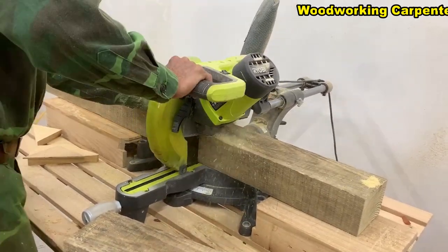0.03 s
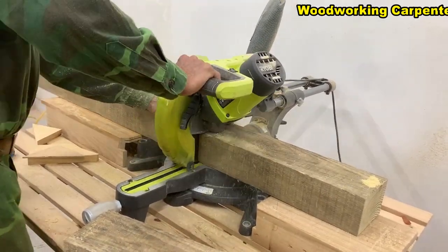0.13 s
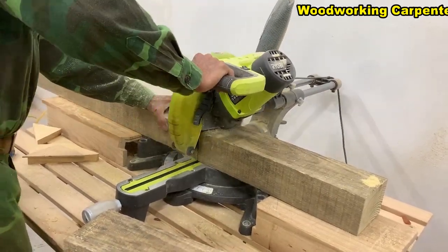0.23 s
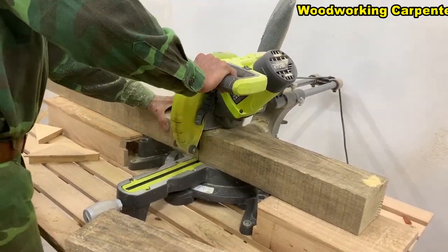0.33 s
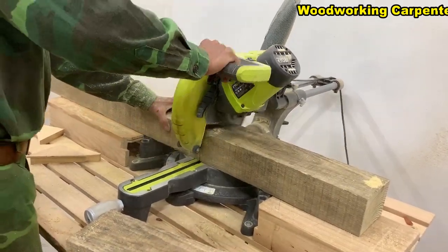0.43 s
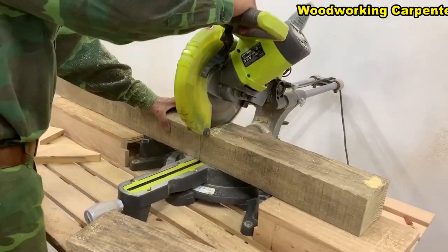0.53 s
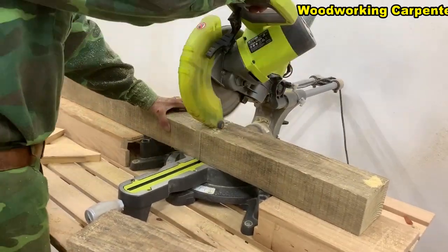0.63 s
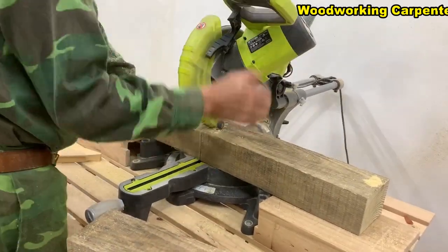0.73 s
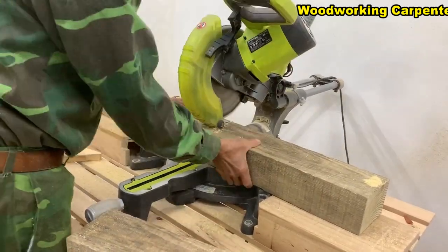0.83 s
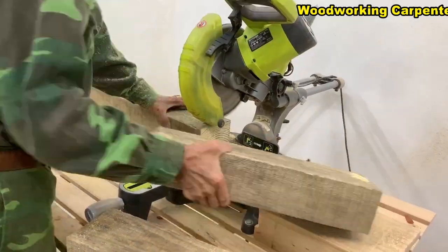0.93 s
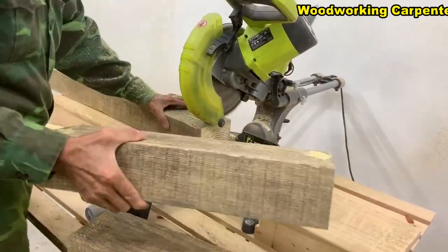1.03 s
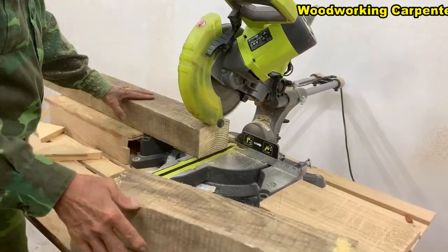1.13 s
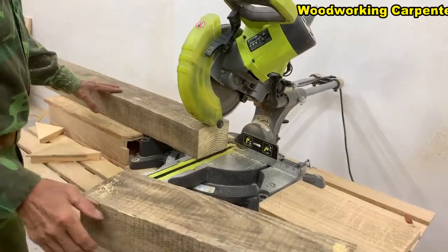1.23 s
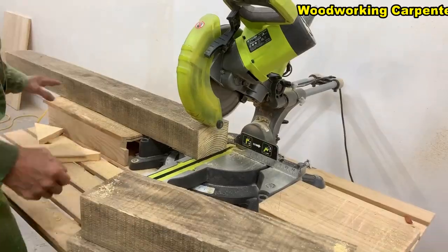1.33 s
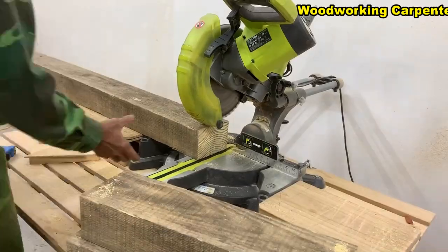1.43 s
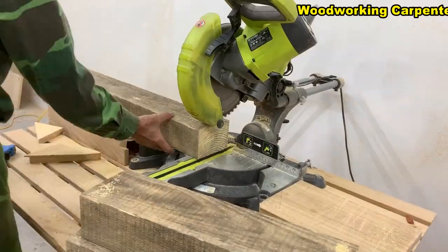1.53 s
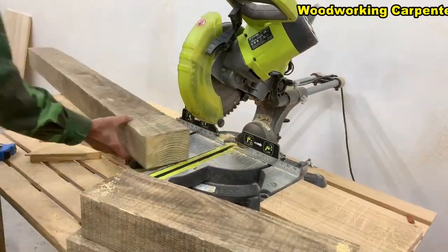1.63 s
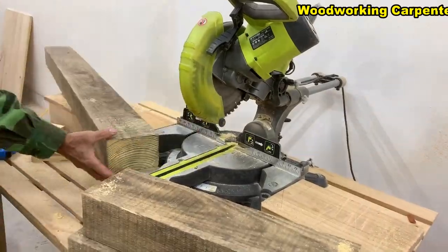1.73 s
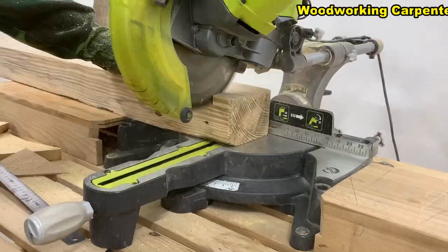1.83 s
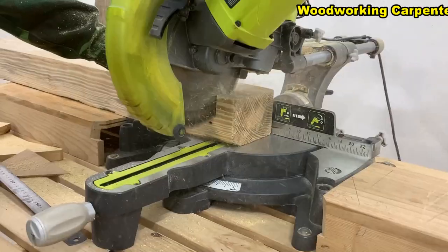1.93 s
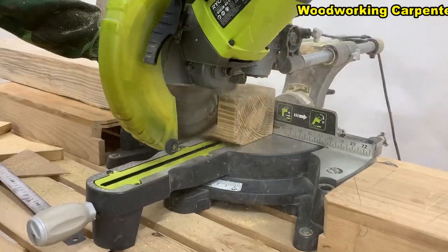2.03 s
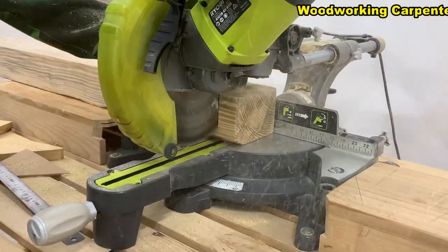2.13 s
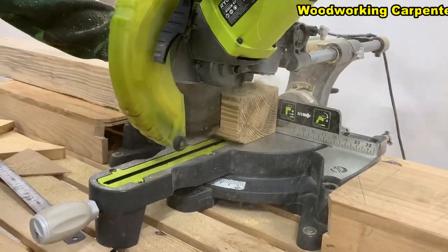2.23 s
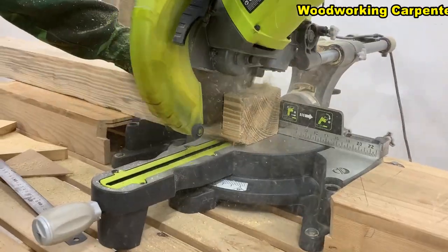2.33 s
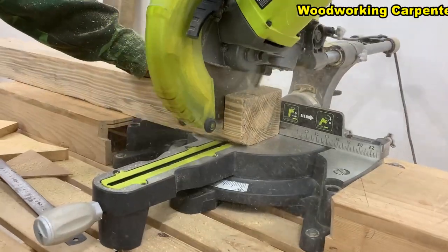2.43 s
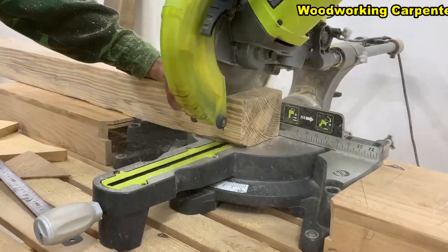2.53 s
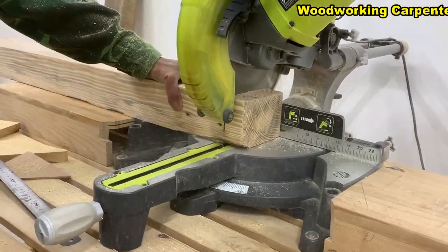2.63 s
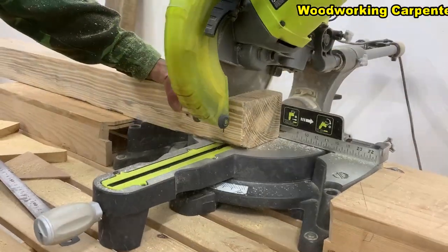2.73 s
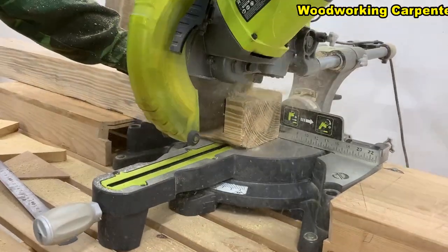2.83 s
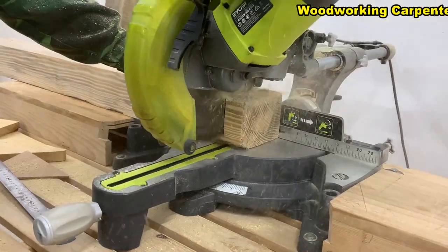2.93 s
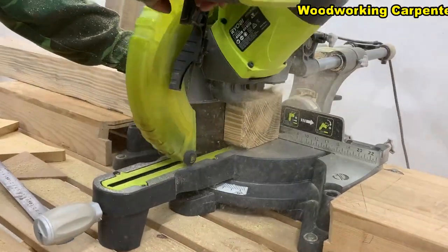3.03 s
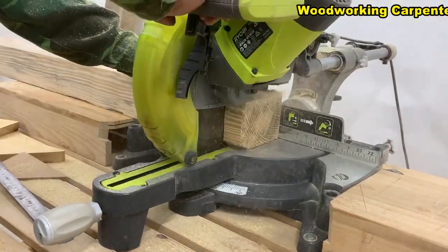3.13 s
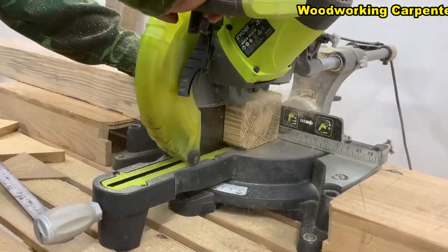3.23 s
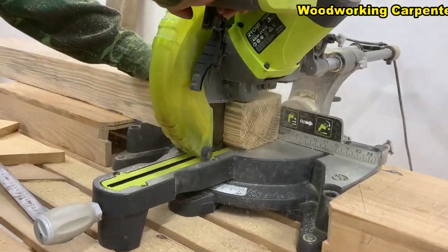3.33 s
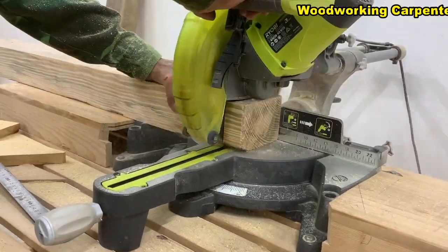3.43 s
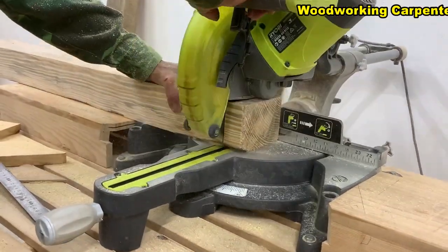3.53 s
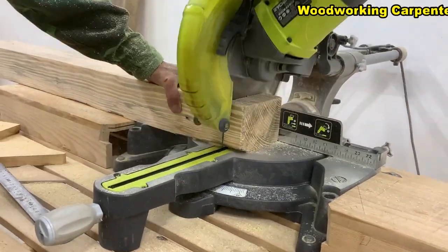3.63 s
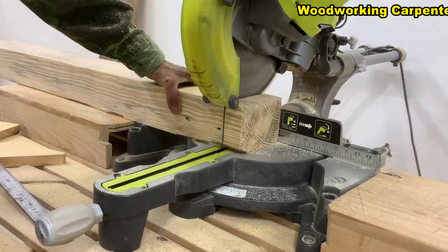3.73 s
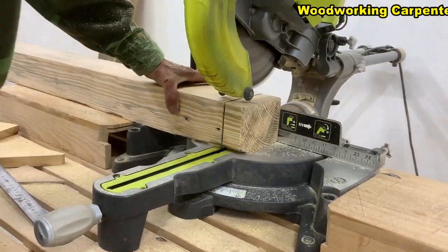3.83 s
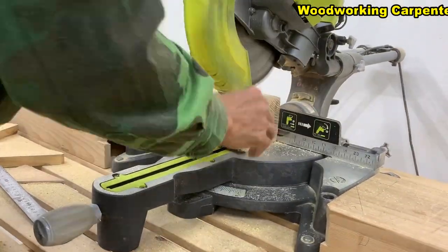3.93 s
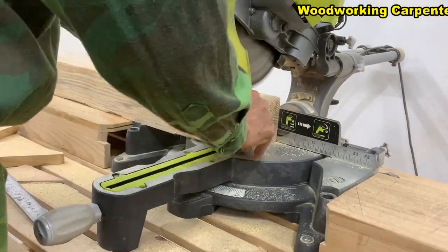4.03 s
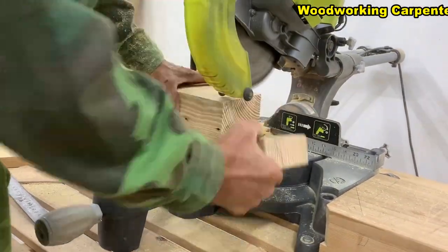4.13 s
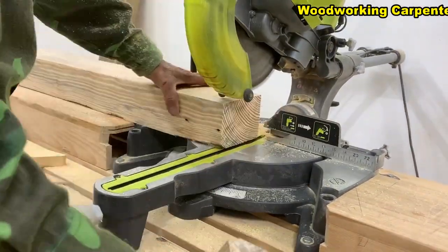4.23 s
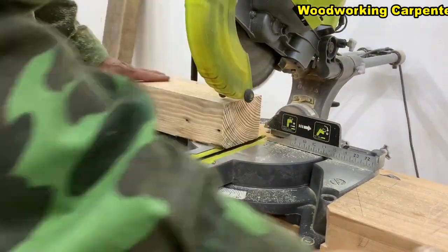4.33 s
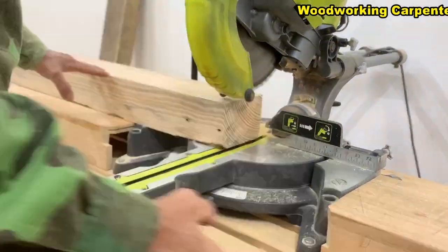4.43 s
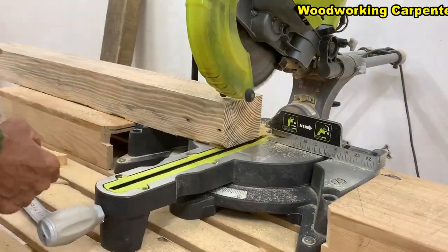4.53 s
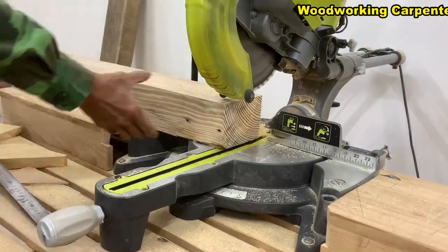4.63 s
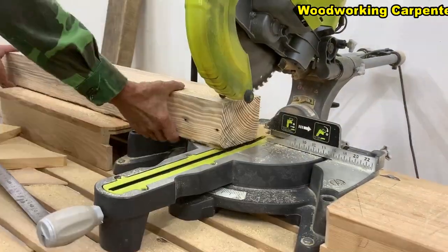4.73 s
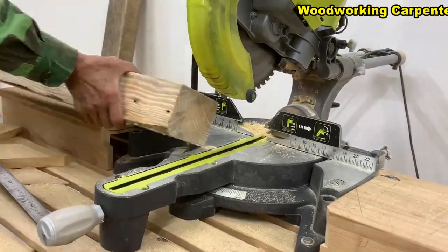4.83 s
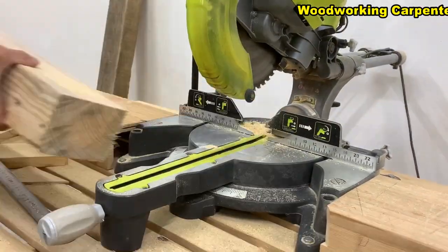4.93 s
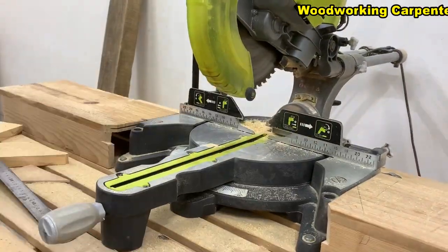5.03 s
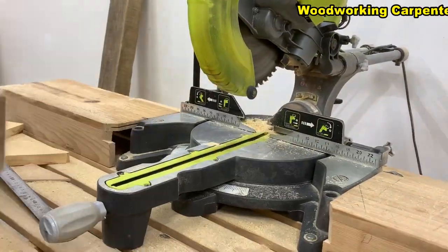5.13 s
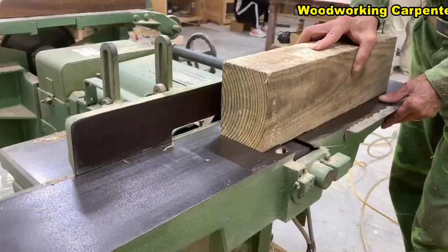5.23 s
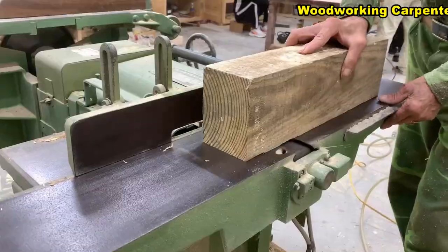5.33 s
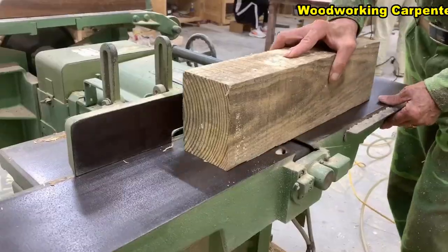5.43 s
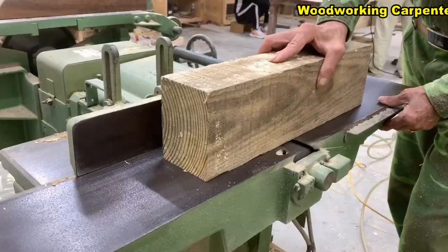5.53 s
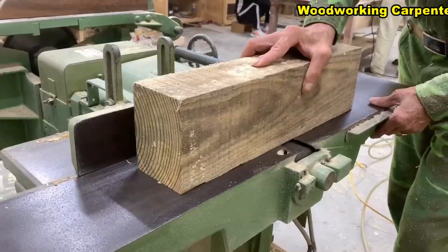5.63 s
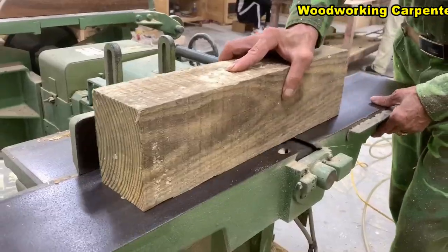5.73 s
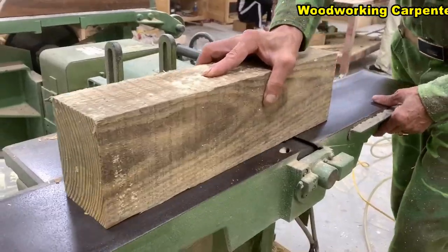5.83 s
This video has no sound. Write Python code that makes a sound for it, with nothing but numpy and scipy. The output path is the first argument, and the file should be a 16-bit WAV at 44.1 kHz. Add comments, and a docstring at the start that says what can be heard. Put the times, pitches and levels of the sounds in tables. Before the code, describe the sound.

Close stereo sound of power tools with little echo: a short saw cut, chattering brake whine, fading metallic rub and one hard timber knock; a tiny gap, then a stronger cut with spraying hiss and another spin-down. Softer knocks and a brief scrape come as wood is lifted. After another tiny gap, a planer buzzes coarsely with a short howl, over the continuous idling hum of machinery.

```python
"""A mitre saw rasps and hisses through the end of a cut, twice, then brakes with a falling whine and a ringing blade.
Knocks of timber on the saw table follow, and after a last short gap a jointer planes a beam with a steady buzz.
The hum of an idling cutter block lies under all three scenes. The cuts are coloured noise, the blade is a bank
of ringing modes, the whines and hums are sine stacks, and the knocks are decaying modes with bursts of noise."""
import sys
import numpy as np
from scipy import signal
from scipy.fft import rfft, irfft
from scipy.io import wavfile

SR = 44100
rng = np.random.default_rng(int(sys.argv[2]) if len(sys.argv) > 2 else 0)


def master_out(mix):
    """Clip the mix to full scale and print it as 16-bit PCM to the path in sys.argv[1]."""
    frames = np.transpose(np.atleast_2d(mix))
    ceiling = np.clip(frames, -1, 1)
    pcm = np.round(ceiling * 32767).astype(np.int16)
    wavfile.write(sys.argv[1], SR, pcm)


N = 259749
TIME = np.arange(N) / SR  # s

# Short gaps between the three scenes: start [t/s], end [t/s]
GAPS = [(1.8515, 1.8635), (5.236, 5.248)]
# One saw cut in each of the first two scenes: brake bites [t/s], speed falls to 1/e in [t/s],
# rasp before easing [level/dB], hiss before easing and surging [level/dB], blade shudder [level/dB],
# rub of the coasting blade [level/dB], change of the hum until the brake [level/dB]
SAW_CUTS = [(0.506, .113, -35.5, -31.5, -45, -54, -7), (3.661, .123, -33.5, -27.5, -35, -52.5, -1.5)]
# The arm pushes the blade into the wood: peak [t/s], half length [t/s], speed lost [share],
# drone of the beam at the peak [level/dB]
ARM_PUSHES = [(0, 0.049, .11, -58), (0.184, .08, .13, -55.5), (0.332, .06, .09, -55),
              (2.153, 0.14, .2, -50.5), (2.47, .09, .12, -51), (2.656, .1, .09, -42.5),
              (3.165, .16, .19, -45.5), (3.492, .095, .17, -46.5)]
# Spectrum of the soft rush of air: [f/Hz], density per Hz [level/dB]
AIR_COLOUR = [(30, -19), (130, -26), (230, -1), (330, -9.5), (450, 0.5), (1100, 5), (2000, -4.5),
              (3500, -6), (5500, -6), (7600, -0.5), (10000, -10), (13000, -1), (15500, -9.5)]

FREE_HZ = 9615  # gear whine of the unloaded motor
BRAKE_S = .16  # how long the brake grips hard
TOP_HZ = 15750  # upper edge of the sound


def saw(cut, shimmer_db=-25, shimmer_t60=1.0, grain=0.082, count=36):
    """Teeth tear out chips unevenly; the kerf damps the blade, and the shudder of the brake sets it ringing."""
    # Torn wood: [f/Hz], density per Hz [level/dB]
    rasp_colour = [(120, -97.5), (220, -22.5), (400, -1.5), (600, -3), (900, 0), (1400, 0.5), (1900, 2.5),
                   (3000, 3.5), (3500, 5), (4800, 6), (5800, 4), (7500, 7), (12000, -10)]
    # Fine spray of chips: [f/Hz], density per Hz [level/dB]
    hiss_colour = [(3500, -10), (5500, -13), (6500, -3), (7500, 1.5), (9000, 4.5), (10200, 2.5), (11300, 5),
                   (12500, 6.5), (14000, 5.5), (15700, 6.5)]
    # Strongest blade modes: [f/Hz], relative [level/dB], t60 [t/s]
    blade_modes = [(2420, -27, .5), (3618, -27, 1.3), (4484, -24, .7), (7477, -22, .7), (7913, -20, .6),
                   (11000, -26, .5), (12300, -16, .55), (12600, -22, .5), (14740, -20, .45)]
    ease_s, ease_db = 0.57, -4  # the cut thins out over its last part
    rasp_fall_db_per_s, hiss_fall_db_per_s, hiss_hold_s = 49, 190, .14
    shudder_half_s, kick_db, blade_db = 0.038, 2, 8
    surge_power = 0.68  # the hiss surges with the speed each time the arm eases off

    brake, slowing_s, rasp_db, hiss_db, shudder_db, rub_db, _ = cut
    pace = speed(brake, slowing_s)
    thinning_db = ease_db * ramp(brake - ease_s, ease_s)
    rasp_level = undb(rasp_db + thinning_db - rasp_fall_db_per_s * since(brake))
    hiss_level = undb(hiss_db + thinning_db - hiss_fall_db_per_s * since(brake + hiss_hold_s))
    surge = (under_load() / .9) ** surge_power
    tearing = (1 + grain * walk(350)) * undb(0.42 * walk(25))
    rasp = shaped(rasp_colour, side_db=-5.5) * rasp_level * pan(0.45)
    hiss = shaped(hiss_colour, side_db=-2.0) * hiss_level * surge * pan(-0.73)
    chips = restless((rasp + hiss) * tearing, depth_db=1.8, rate=18, count=20)

    # the teeth drive the blade faintly, the shudder drives it hard
    kick = undb(shudder_db + kick_db) * swell(brake + BRAKE_S - shudder_half_s, 2 * shudder_half_s)
    blows = noise() * (0.083 * rasp_level + kick)
    blade = sum(undb(db) * ring(blows, hz, t60) for hz, db, t60 in blade_modes) * undb(blade_db)
    # a thin disc has a crowd of weaker modes too; the high ones die first
    crowd = 1700 * 7.5 ** ((np.arange(count) + rng.random(count)) / count)
    shimmer = sum(ring(blows, hz, shimmer_t60 * np.sqrt(4000 / hz)) for hz in crowd)
    blade += undb(shimmer_db) * shimmer
    # the turning disc swings its ring past the ear
    turn = 2 * np.pi * np.cumsum(FREE_HZ * pace / 40) / SR
    metal = blade * (1 + .5 * np.sin(turn))
    metal = metal + motor(pace, gear_level(brake)) + coasting(brake, shudder_db, rub_db, shudder_half_s)
    return (low_cut(chips, 212) + low_cut(metal, 470)) * pan(-2.1)


def motor(pace, gear, unsteady=0.018, chatter_db=-3):
    """Gear and armature whines follow the shaft speed; gears chatter in their backlash, most under the brake."""
    # Higher whines, each loudest at a resonance of the housing: multiple of the gear whine,
    # peak before roughness [level/dB], resonance [f/Hz], width [octaves]
    whines = [(1.7, -38.5, 14000, .25), (2.25, -40, 6300, .17), (5.1, -49, 7000, .24), (5.1, -57, 4300, .2)]
    hz, rough = FREE_HZ * pace, .45
    braking = np.clip(2 * (1 - pace), .15, 1)
    wander = unsteady * (braking ** 2 * gear / gear.max() + 0.0956) * walk(212)
    phase = 2 * np.pi * np.cumsum(hz * (1 + wander + .004 * walk(12.5))) / SR
    # complex noise varies level and phase together, differently left and right
    flicker = np.array([walk(220) + 1j * walk(280), walk(160) + 1j * walk(260)])
    rattle = 1 + rough * (1 + braking) * flicker
    chatter = np.array([walk(1100) + 1j * walk(830), walk(1100) + 1j * walk(990)])
    chatter = chatter * undb(chatter_db + 1.1 * walk(60)) * braking
    fitful = pace ** .4 * undb(2.5 * walk(18))
    out = gear * fitful * ((rattle + chatter) * np.exp(1j * phase)).real
    for k, db, centre_hz, octaves in whines:
        housing = np.exp(-(np.log2(k * hz / centre_hz) / octaves) ** 2) * (k * hz < TOP_HZ)
        out += undb(db) * housing * (rattle[::-1] * np.exp(1j * k * phase)).real
    return out


def coasting(brake, shudder_db, rub_db, shudder_half_s, beat_hz=36, depth=0.28):
    """The slightly warped disc shudders as the brake lets go and rubs on: a fluttering rasp in its low resonances."""
    # Shudder of the disc: [f/Hz], density per Hz [level/dB]
    shudder_colour = [(1200, -34), (2200, -27), (2900, -8), (3600, 9), (4600, 2), (5900, 16), (7000, -24),
                      (12000, -27)]
    rub_colour = [(1200, -28), (1900, 1.5), (2500, -3), (3100, -12), (3620, 6.5), (4050, -8),
                  (4550, -0.5), (5200, -14), (6200, -4.5), (9000, -12), (12000, -19)]
    rub_fall_db_per_s, coast_s = 4.5, 0.94
    release = brake + BRAKE_S
    turn = 2 * np.pi * np.cumsum(beat_hz * (1 + 0.211 * walk(6.26))) / SR
    shudder = shaped(shudder_colour) * undb(shudder_db) * swell(release - .02, shudder_half_s)
    turning = ramp(brake, BRAKE_S) * (1 - ramp(brake + coast_s, .1))
    rub = shaped(rub_colour) * undb(rub_db - rub_fall_db_per_s * since(release)) * turning
    return restless(shudder + rub, depth_db=3.5, rate=20.0) * (1 + depth * np.sin(turn))


def gear_level(brake):
    """The gear whine jumps up when the brake bites and drops when it lets go."""
    run_db, brake_db, bite_s, fall_db_per_s = -48, -35, 0.012, 420
    return undb(run_db + (brake_db - run_db) * ramp(brake, bite_s) - fall_db_per_s * since(brake + BRAKE_S))


def speed(brake, slowing_s):
    """Shaft speed as a share of free running: the brake lets it die away, then it coasts."""
    coast_share, coast_slowing_s = 0.13, .7
    braked = under_load() * np.exp(-since(brake) / slowing_s)
    return np.maximum(braked, coast_share * np.exp(-since(brake) / coast_slowing_s))


def under_load():
    """Share of the free speed that is left as each push drags the motor down."""
    return 1 - sum(sag * swell(s, half) for s, half, sag, _ in ARM_PUSHES)


def jointer(tone_db=1.5, chips_db=0, bite=0.24, jitter=0.0013, waver_db=3):
    """Knives strike the beam at a steady rate: a buzzing stack, and a spray of chips at every stroke."""
    # Overtones of the knife strokes: multiple of the knife rate, relative [level/dB]
    overtones = [(1, -16), (2, -1), (4, -15), (5, -8), (6, 0), (7, -7), (8, -3), (9, -11), (10, -11),
                 (11, -9), (13, -11), (14, -11), (16, -6), (18, -6), (20, -7), (21, -8), (24, -11),
                 (27, -11), (28, -9), (30, -12), (34, -5), (35, -8), (36, -10), (37, -8), (38, -4),
                 (40, -5), (41, -11), (42, -10), (44, -10)]
    # Spray of chips: [f/Hz], density per Hz [level/dB]
    chip_colour = [(40, -45), (140, -23), (300, -9), (600, -1), (2800, 3.5), (5300, 3), (7000, 0),
                   (11000, -1.5), (15500, -4)]
    knife_hz, plane_db = 348.27, -33
    whistle_hz, whistle_db = 1538.3, -45.5
    howl_db, howl_swell_db = -50, -36  # steady part, and the swell added to it
    howl_peak_s, howl_rise_s, howl_fall_s = 5.73, 0.14, 0.026

    phase = 2 * np.pi * np.cumsum(knife_hz * (1 + jitter * walk(96))) / SR
    now = TIME >= GAPS[1][1]
    # knots and fibres make the upper overtones waver
    grain = 0.74 * walk(36) + 0.75 * np.array([walk(60), walk(60)])
    tone = 0
    for k, db in overtones:
        lead = rng.uniform(0, 2 * np.pi) + np.array([[.5], [-.5]]) * min(.5 + k / 20, 1)
        waver = waver_db * min(k / 10, 1) * np.roll(grain, rng.integers(N), axis=1)[:, now]
        tone = tone + undb(db + waver) * np.sin(k * phase[now] + lead)
    chips = restless(shaped(chip_colour, side_db=-4), depth_db=1.0, rate=25)
    strokes = 1 + bite * np.cos(2 * phase) + 0.14 * np.cos(phase)
    planing = undb(chips_db) * chips * strokes * now
    planing[:, now] += undb(tone_db) * unit(tone)
    # the table howls on the eighth overtone, swelling once as the beam passes
    passing = swell(howl_peak_s, np.where(TIME < howl_peak_s, howl_rise_s, howl_fall_s))
    howl_level = undb(howl_db) + undb(howl_swell_db) * passing
    howl = howl_level * np.sin(8 * phase + .7 * walk(40)) * now
    whistle = undb(whistle_db) * np.sin(2 * np.pi * whistle_hz * TIME + .3 * walk(10)) * now
    return (low_cut(planing, 226) * undb(plane_db) + howl + whistle) * pan(-0.82)


def knocks(crack_db=-4, crack_t60=0.015, scuff_db=-23, scuff_t60=0.24):
    """Each blow cracks and thuds in the beam, and the rough wood scuffs on; hard blows ring the metal table."""
    # Timber against the saw table: [t/s], click [level/dB], thud [level/dB]
    blows = [(1.199, -8.5, -21), (4.505, -22.5, -25), (4.538, -23.5, -55), (4.685, -36, -60),
             (4.776, -36, -42), (4.788, -29, -52), (4.8817, -34, -60), (4.8851, -18, -52),
             (4.908, -32, -52)]
    # Modes of the metal table: [f/Hz] before a random detune, relative [level/dB], t60 [t/s]
    table_modes = [(2467, -16, .02), (4040, 2, .02), (4280, -7, .02), (5660, -8, .015), (6480, -5, .014),
                   (8330, 1, .008)]
    # Modes of the beam: [f/Hz] before a random detune, relative [level/dB], t60 [t/s]
    beam_modes = [(368, -11, .08), (470, -8, .09), (787, -14, .06), (1035, 0, .075), (1218, -8, .06),
                  (1305, -6, .05), (1520, -10, .05), (1900, -13, .04)]
    # Contact noise of a blow: [f/Hz], density per Hz [level/dB]
    crack_colour = [(40, -50), (150, -25), (400, -4), (1200, 0), (2400, -3), (3100, -5), (4200, -1),
                    (6200, 0), (8500, -2), (11000, -12), (15500, -14)]
    out, t = np.zeros((2, N)), TIME[:SR // 5]
    hardest = max(click_db for _, click_db, _ in blows)

    def struck(modes):
        """Sum of decaying modes, each blow slightly detuned."""
        total = 0
        for hz, db, t60 in modes:
            detuned_hz = hz * (1 + 0.021 * rng.standard_normal())
            lead = 1.04 * rng.standard_normal((2, 1))
            total = total + undb(db - 60 * t / t60) * np.sin(2 * np.pi * detuned_hz * t + lead)
        return total

    for s, click_db, thud_db in blows:
        contact = undb(crack_db - 60 * t / crack_t60) + undb(scuff_db - 60 * t / scuff_t60)
        crack = unit(colour(rng.standard_normal((2, len(t))), crack_colour)) * contact
        # softer blows ring the metal less, beyond their lower click level
        metal = 0.68 * undb(.5 * (click_db - hardest)) * struck(table_modes)
        click = undb(click_db) * (metal + crack) * (1 - np.exp(-t / 0.00033))
        thud = undb(thud_db) * struck(beam_modes) * (1 - np.exp(-t / 0.0028))
        i = int(s * SR)
        out[:, i:i + len(t)] += (click + thud) * pan(-1.7)
    light = low_cut(out, 225)  # a short contact radiates little bass
    return room(light, wet_db=-19, t60=0.17)


def scrape():
    """Rough wood sticks and slips on the metal for a moment as the beam is lifted off the table."""
    # Scraping wood: [f/Hz], density per Hz [level/dB]
    scrape_colour = [(900, -27), (1500, -10), (2000, 5), (2600, -12), (3700, -7), (4700, 3), (6000, -9),
                     (12000, -20)]
    start_s, fade_s, level_db, slips_per_s = 4.922, 0.017, -37, 260
    slips = 1 + 0.55 * np.sin(2 * np.pi * np.cumsum(slips_per_s * (1 + 0.29 * walk(80))) / SR)
    envelope = ramp(start_s, .003) * np.exp(-since(start_s) / fade_s)
    return shaped(scrape_colour) * slips * undb(level_db) * envelope * pan(-2)


def bench(drone_power=1.73):
    """The cut shakes the table and each push makes the beam drone; in the first cut the blade sings in the kerf."""
    # Deep rumble of the table: [f/Hz], density per Hz [level/dB]
    rumble_colour = [(20, -1.5), (70, -3.5), (105, 1), (180, -3), (300, -6), (600, -40)]
    shake_colour = [(20, -26), (100, -15.0), (200, 3), (400, 8), (1500, -8.5)]  # its wooden body
    shake_db, rumble_db = -57.5, -64.5
    clear_s = 0.16  # the teeth leave the wood this long before the brake
    sing_hz, sing_db, sing_end_s = 1250, -49.5, 0.444
    starts = (0, GAPS[0][1])
    in_wood = sum((TIME >= start) * (1 - ramp(cut[0] - clear_s, 0.023)) for start, cut in zip(starts, SAW_CUTS))
    shake = shaped(shake_colour, side_db=8) * undb(shake_db)
    rumble = shaped(rumble_colour, side_db=0) * undb(rumble_db + 3.2 * walk(28))
    pressure = sum(undb(db) * swell(s, half) ** drone_power for s, half, _, db in ARM_PUSHES)
    drone = np.sin(2 * np.pi * 392 * TIME + 0.36 * walk(30)) * pressure * undb(2.4 * walk(30))
    sing = np.sqrt(2) * np.sin(2 * np.pi * sing_hz * TIME + 0.35 * walk(20))
    sing = sing * np.clip((sing_end_s - TIME) / 0.046, 0, 1) * undb(sing_db + 3.0 * walk(28))
    return ((shake + rumble) * in_wood + drone + sing) * pan(-3)


def bumps():
    """Short, soft swells of bass here and there."""
    # Dull bumps: peak [t/s], [level/dB]
    bass_bumps = [(.52, -65), (.67, -72), (3.75, -64.5), (5.425, -62), (5.78, -74)]
    bass = shaped([(20, -18), (100, -4), (170, -5), (400, -36)], side_db=-2)
    return bass * sum(undb(db) * swell(s, 0.014) for s, db in bass_bumps)


def shop():
    """The idling cutter block chops the air into a steady siren tone, over a soft rush."""
    # Hum in each scene: multiple of the hum rate (rounded to a whole number),
    # before the scene's own level [level/dB], left minus right [level/dB]
    first_hum = [(1, -59.5, -3), (2, -45.5, -4.5), (3, -58.5, -4), (4, -38, 0.5), (6, -57, -1),
                 (12, -68, -15), (18, -65, 3), (40, -60.5, 1)]
    second_hum = [(1, -58, -6), (2, -45.5, -5), (3, -64.5, -6), (4, -38.5, -3), (5, -65.5, -14),
                  (6, -55, 6), (8, -67.5, 18), (10, -51, -6), (12, -61, -6), (15, -67, -1), (20, -63.5, -5),
                  (39.8, -58, 3)]
    third_hum = [(1, -56.5, -11), (2, -45.5, -0.5), (4, -43, -16.5), (6, -40.5, -12.5), (8, -52, -3),
                 (10, -49.5, -13)]
    hum_hz, air_db = 251.76, -53.5
    phase = 2 * np.pi * np.cumsum(hum_hz * (1 + 0.00035 * walk(2.98))) / SR
    shot = np.searchsorted([end for _, end in GAPS], TIME)  # scene number 0, 1 or 2
    flutter = np.array([walk(28), walk(18)])
    out = undb(air_db) * shaped(AIR_COLOUR, side_db=0.5) * pan(0.31)
    for i, partials in enumerate([first_hum, second_hum, third_hum]):
        now = shot == i
        for k, db, pan_db in partials:
            lead = rng.uniform(0, 2 * np.pi) + np.array([[0], [.35]])
            waver = 1 + 0.11 * np.log(1 + k) * np.roll(flutter, rng.integers(N), axis=1)[:, now]
            out[:, now] += undb(db) * pan(pan_db) * waver * np.sin(round(k) * phase[now] + lead)
    return out * undb(hum_level(shot))


def hum_level(shot):
    """Level of hum and air in dB: low under each cut, swelling back after it, steady at the jointer."""
    low_db, swell_db_per_s, return_s, jointer_db = -3, 3.5, .1, 2.5
    by_scene = []
    for brake, *_, dip_db in SAW_CUTS:
        dip = dip_db * (1 - ramp(brake, return_s))
        by_scene.append(low_db + dip + swell_db_per_s * since(brake))
    return np.choose(shot, by_scene + [jointer_db])


def room(x, wet_db, t60):
    """Diffuse, dull echo of the walls, different left and right."""
    t = TIME[:SR // 2]
    tail = colour(rng.standard_normal((2, len(t))), [(300, -5), (4000, -4.5), (12000, -31)])
    tail = tail * undb(-60 * t / t60) * (t > .003)
    tail /= np.sqrt(np.sum(tail ** 2) / 2)
    return x + undb(wet_db) * signal.fftconvolve(x, tail, axes=1)[:, :N]


def restless(x, depth_db, rate, count=14):
    """Neighbouring bands swell and fade on their own, as when a tool meets fibres of changing hardness."""
    place = np.sqrt(np.fft.rfftfreq(N, 1 / SR) / TOP_HZ) * (count - 1)
    spectrum, drift = rfft(x), walk(rate)
    out = 0
    for k in range(count):
        band = irfft(spectrum * np.clip(1 - abs(place - k), 0, 1), N)
        out = out + band * undb(depth_db * np.roll(drift, rng.integers(N)))
    return out


def ring(x, hz, t60):
    """One decaying mode driven by x; white noise keeps its level."""
    r = np.exp(-np.log(1000) / (t60 * SR))
    pole = r * np.exp(2j * np.pi * hz / SR)
    return signal.lfilter([np.sqrt(2 * (1 - r * r))], [1, -pole], x).imag


def shaped(points, side_db=-4):
    """Coloured stereo noise whose middle has rms 1."""
    x = colour(noise(side_db), points)
    return x / np.std(x.mean(axis=0))


def noise(side_db=-4):
    """Stereo noise from a shared middle and a coloured side: alike in the low mids, less so in the treble."""
    mid, side = rng.standard_normal((2, N))
    side = colour(side, [(80, 3.5), (350, -4), (2000, 4.0), (12000, 0.0)]) * undb(side_db)
    return mid + side * np.array([[1], [-1]])


def colour(x, points):
    """Filter by a spectrum of (Hz, dB) points."""
    hz, db = np.transpose(points)
    f = np.fft.rfftfreq(x.shape[-1], 1 / SR) + 1  # 1 Hz up, to keep the logarithm finite
    return irfft(rfft(x) * undb(np.interp(np.log(f), np.log(hz), db)), x.shape[-1])


def low_cut(x, hz):
    """Steep high-pass."""
    return signal.sosfilt(signal.butter(4, hz, "high", fs=SR, output="sos"), x)


def walk(rate):
    """Smooth chance with a spread of 1, faster for a higher rate in Hz."""
    smoothing = np.exp(-(np.fft.rfftfreq(N, 1 / SR) / rate) ** 2)
    return unit(irfft(rfft(rng.standard_normal(N)) * smoothing, N))


def undb(db):
    """Amplitude factor of a level in dB."""
    return 10 ** (np.asarray(db) / 20)


def unit(x):
    """Scale to rms 1."""
    return x / np.sqrt(np.mean(x ** 2))


def pan(db):
    """Left and right gains that differ by db."""
    return undb(np.array([[.5], [-.5]]) * db)


def between(start, end):
    """True from start to end in seconds."""
    return (TIME >= start) & (TIME < end)


def ramp(start, length):
    """Rises from 0 to 1."""
    return np.clip((TIME - start) / length, 0, 1)


def since(start):
    """Seconds gone by, 0 before the start."""
    return np.maximum(TIME - start, 0)


def swell(s, half_length):
    """A smooth rise and fall that peaks at 1."""
    return np.exp(-((TIME - s) / half_length) ** 2)


def scene():
    """Two saw cuts, then the jointer, with knocks, table sounds and the hum of the shop."""
    saw_scenes = [between(0, GAPS[0][0]), between(GAPS[0][1], GAPS[1][0])]
    saws = sum(saw(cut) * now for cut, now in zip(SAW_CUTS, saw_scenes))
    return saws + jointer() + knocks() + scrape() + bench() + bumps() + shop()


def record(dry):
    """Only a faint hiss is left in the gaps; the top is cut off."""
    gap = sum(between(start, end) for start, end in GAPS)
    joined = dry * (1 - gap) + undb(-48) * shaped(AIR_COLOUR) * gap
    return signal.sosfilt(signal.ellip(12, .1, 80, TOP_HZ, fs=SR, output="sos"), joined)


dry = scene()
out = record(dry)
master_out(out)
```